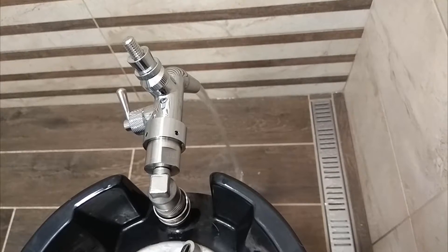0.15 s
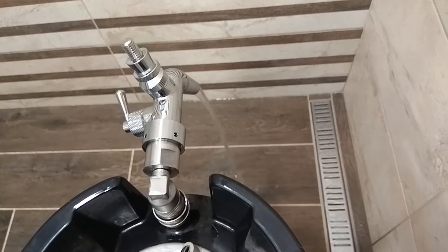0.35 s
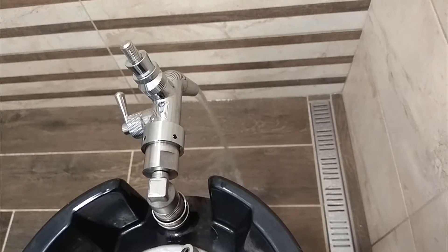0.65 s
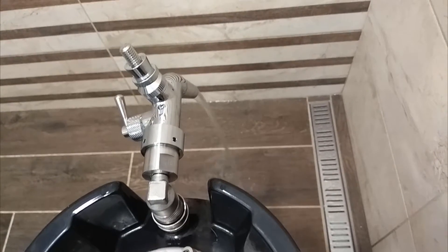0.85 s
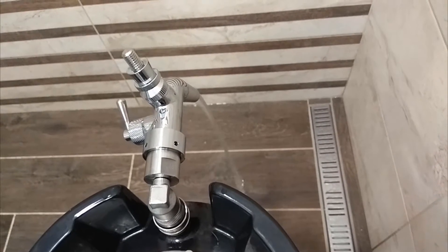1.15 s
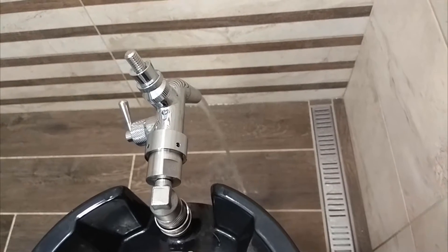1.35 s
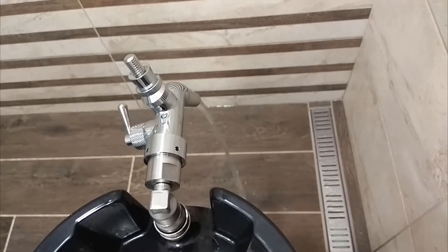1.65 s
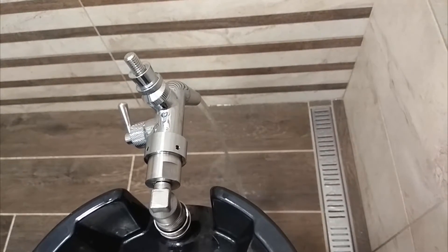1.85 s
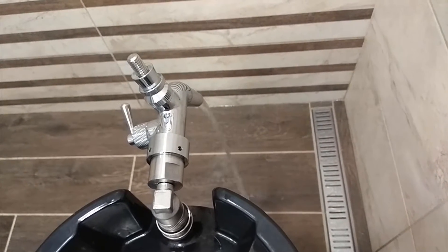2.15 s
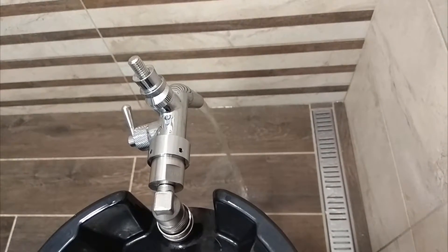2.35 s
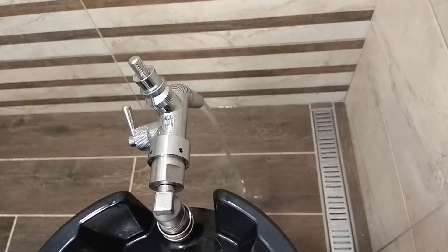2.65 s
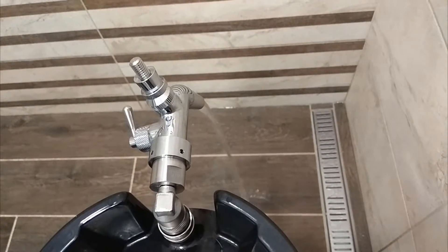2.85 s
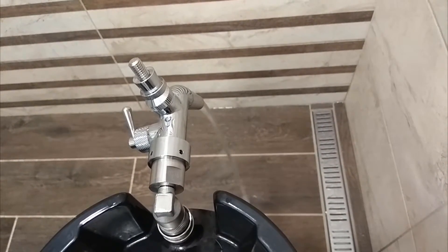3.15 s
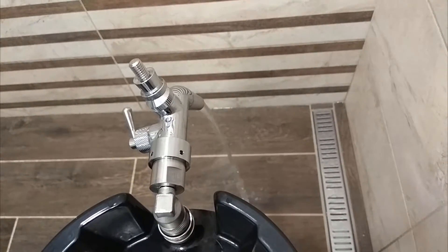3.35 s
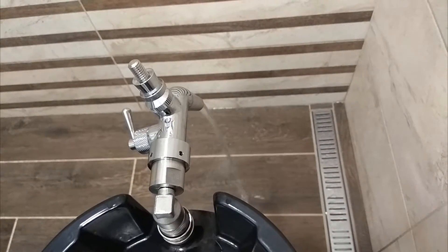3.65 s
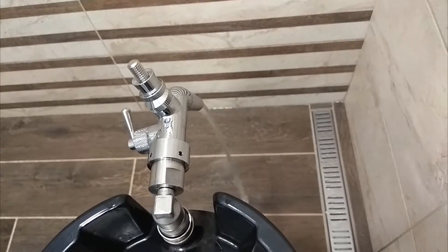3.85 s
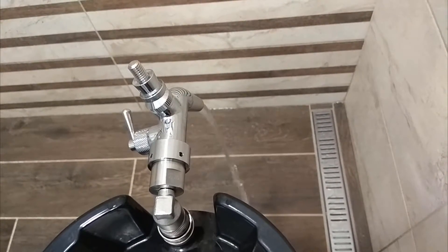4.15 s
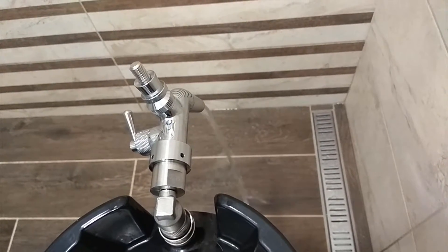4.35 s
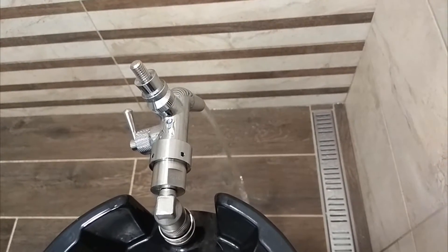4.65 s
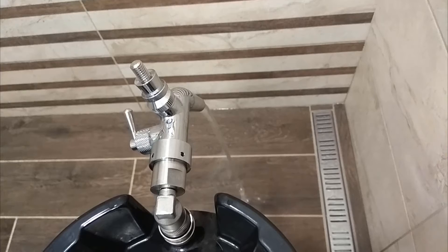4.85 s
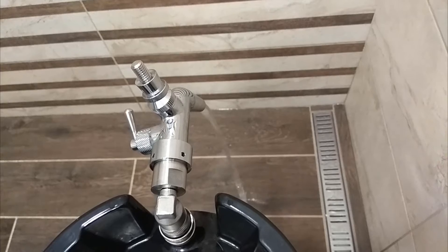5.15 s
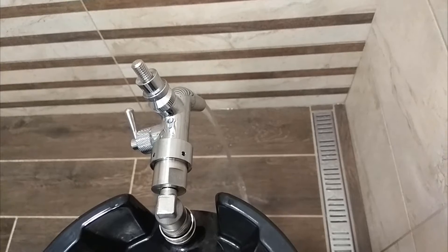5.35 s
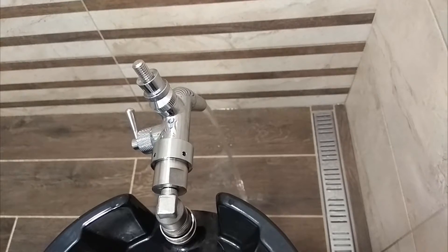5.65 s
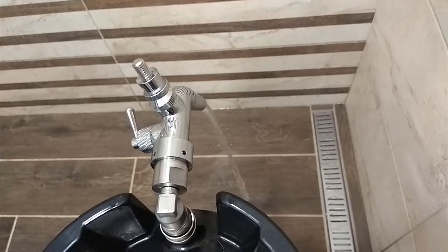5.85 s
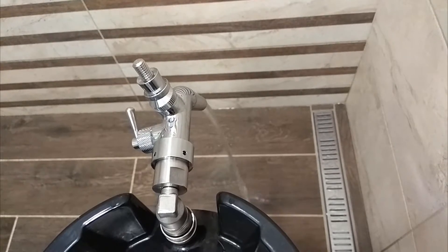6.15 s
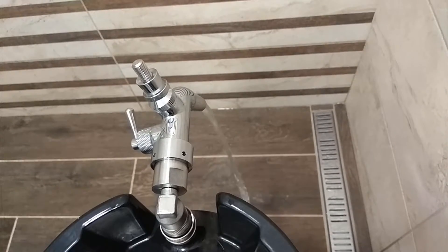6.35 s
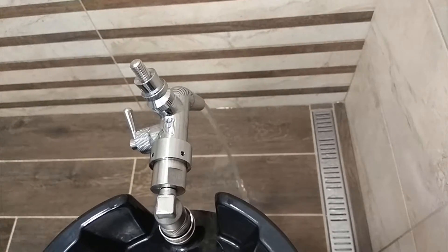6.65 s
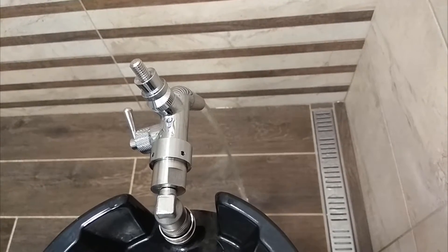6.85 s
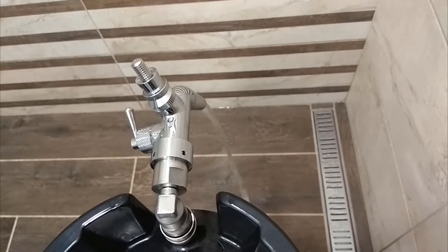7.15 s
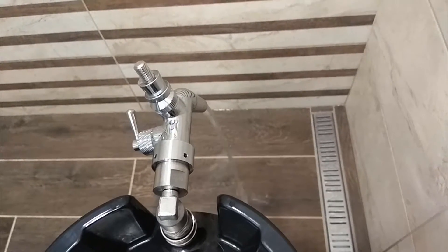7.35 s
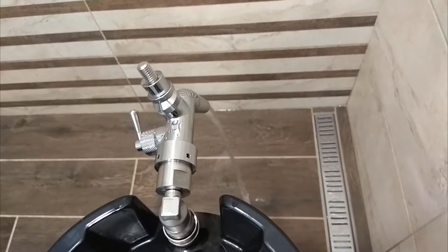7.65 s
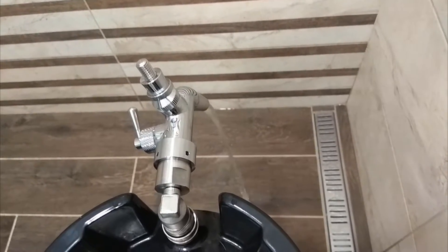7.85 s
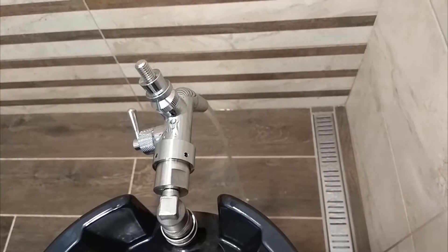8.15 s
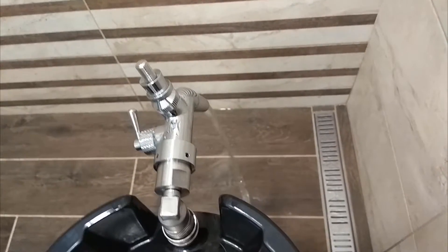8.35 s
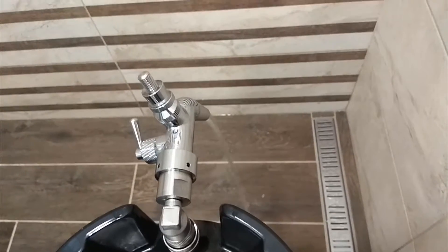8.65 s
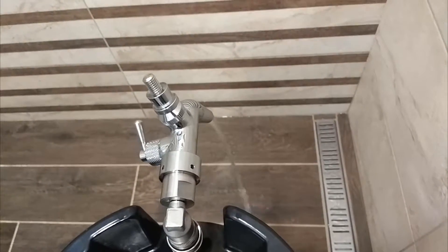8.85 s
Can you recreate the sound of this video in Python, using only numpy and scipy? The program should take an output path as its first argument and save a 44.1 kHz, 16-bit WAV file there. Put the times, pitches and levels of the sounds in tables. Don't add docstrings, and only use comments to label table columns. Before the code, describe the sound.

Water and gas spit from a metal spout in a small tiled bathroom, sharp irregular pops and crackles over fine spray hiss and fan hum.

```python
import sys
import numpy as np
from scipy import signal
from scipy.fft import rfft, irfft
from scipy.io import wavfile

SR = 44100
rng = np.random.default_rng(int(sys.argv[2]) if len(sys.argv) > 2 else 0)


def persist_wave(psi):
    counts = np.round(np.clip(psi, -1, 1) * 32767).astype(np.int16)
    wavfile.write(sys.argv[1], SR, np.atleast_2d(counts).T)


def undo_db(level):
    steps = np.asarray(level, float) / 20
    return 10 ** steps


N = 396900

# f/Hz, level/dB
FAN_COLOUR = [(30, -30), (60, -18), (120, -15), (140, -10.5), (155, 1), (200, -1), (340, -2), (405, -13.5),
              (455, -11.5), (770, -9), (890, -12.5), (1300, -15.5), (3000, -17.5), (5000, -68)]
# f/Hz, width/Hz, lift/dB
ROOM_MODES = [(160.4, 44, 5), (217.7, 14, 7.5), (282.1, 6.8, 7.5), (354.5, 32, 5), (450, 18, 8.5),
              (575.4, 16.5, 8.5), (775, 13, 8.5)]
# f/Hz, likeness (1 = the same)
FAN_LIKENESS = [(25, .8), (60, 0.9), (110, 0.88), (160, 0.98), (270, 1), (450, 0.2), (750, 0.16), (1200, 0)]
# start t/s, end t/s, f/Hz, level/dB
WHISTLES = [
    (8.15, 8.55, 1880, -61),
    (3.28, 3.44, 1050, -57),
]
# f/Hz, level/dB
SPRAY_COLOUR = [(3000, -14.5), (5000, -5), (6600, 0), (9000, 3), (11200, 9.5), (13500, 7.5), (15000, 6),
                (15700, -2.5)]
# t/s, level/dB
FLOW = [(0.0, -27.5), (0.15, -45), (0.77, -41.5), (1.0, -40.5), (1.38, -39.5), (2.35, -42.5), (2.56, -39.5),
        (3.21, -35), (3.53, -47), (3.86, -35), (4.56, -48.5), (4.89, -37), (5.71, -43), (5.86, -38.5),
        (6.09, -45), (6.54, -41.5), (8.45, -42.5), (9.0, -40.5)]
# f/Hz, level/dB
CRACK_COLOUR = [(1500, -31), (3000, -28), (4500, -12), (6700, -5.5), (9000, -4.5), (11300, 1), (13500, -4),
                (15000, -3), (15700, -2.5)]
# t/s, crack level/dB, tilt to treble/dB, ring level/dB,
# radius/mm
GULPS = [(0.204, -6, -23.5, -21, 0.77), (0.2771, -7.5, -17, -16, 1.16), (0.8572, -6, -8, -13, 1.56),
         (0.9209, -4.5, -9, -36, 1.9), (0.9773, -2, -16, -17.5, 2.07), (0.9775, -30, -10, -24, 0.71),
         (1.049, -7, -6, -11, 1.61), (1.5912, -6, -25.5, -17, 1.27), (1.6543, -18, 4, -26, 0.99),
         (1.6957, -11.5, -15, -14, 1.52), (2.237, -4.5, -7, -17.5, 0.9), (2.9763, -13, -15, -17, 0.95),
         (3.0978, -9, -1, -25.5, 1.01), (3.724, -6.5, -14, -18, 1.15), (3.8849, -6.5, -4, -10.5, 1.75),
         (4.192, -10.5, -4, -19.5, 1.33), (4.6356, -6.5, -5, -21, 0.94), (5.2629, -9, -16, -18, 0.8),
         (5.8068, -18.5, 1, -31, 0.98), (6.6803, -5.5, -15, -15.5, 1.48), (6.7805, -11.5, -10, -18, 0.8),
         (7.1917, -3.5, -23, -14.5, 0.95), (7.8492, -8, -29, -23.5, 0.88), (8.473, -13.5, -4, -26, 1.05),
         (8.8766, -2.5, 2.5, -34, 3.8), (2.15, -12.5, -11, -34.5, 1), (2.372, -7, -8, -21, 0.71),
         (2.595, -15.5, -9, -20.5, 0.57), (3.3902, -9, -18.5, -23, 0.41), (3.8396, -9.5, -1, -19, 0.7),
         (6.5183, -14, -23, -23, 0.63), (8.781, -13, 6, -21.5, 0.66)]
# t/s, crack level/dB, tilt to treble/dB, ring level/dB
SNAPS = [(0.239, -6.5, -7, -58), (2.7584, -9, -23.5, -36), (2.776, -12.5, 5, -56), (3.04, -24, -10, -37),
         (3.2081, -11, -5, -26), (3.71, -17, -5, -57), (4.174, -16, 9, -47), (4.2985, -6, -9, -47),
         (4.6815, -10, -5, -55), (4.7446, -13.5, -20, -38), (4.783, -11.5, -3, -54),
         (5.224, -12, -4, -19.5), (5.698, -0.1, 2.5, -39), (5.9956, -9.5, -8.5, -65),
         (6.2382, -7, -6.5, -43), (6.4052, -11.5, -14, -37), (6.44, -14, 10, -33.5),
         (6.607, -10.5, -2, -33), (6.673, -11.5, -13, -37), (6.9854, -7, -15, -47), (7.2485, -8, -14, -43),
         (7.697, -11, -14, -45), (8.2303, -10, -9.5, -55), (8.5246, -15, 10, -42), (8.756, -10, -7, -41),
         (8.8758, -18, 2, -22)]
# t/s, crack level/dB, tilt to treble/dB
SPITS = [(0.085, -19, -1), (0.379, -20, -4), (0.4453, -20.5, -12), (0.544, -15.5, -8), (0.685, -13, -9),
         (1.172, -15.5, -9), (1.366, -21.5, 0), (1.7685, -19, -14), (1.877, -21.5, -20),
         (1.9857, -18.5, -3), (2.099, -20, 10), (2.548, -19.5, 7), (2.825, -16, -10), (2.9143, -22, 0),
         (3.3447, -12, -11), (3.549, -16.5, -16), (4.12, -31.5, 27), (4.514, -19, -4), (4.9068, -14, -6),
         (5.037, -13.5, -7), (5.195, -16.5, -1), (5.4836, -23, -11), (5.9066, -23, 1), (5.971, -16.5, -4),
         (6.194, -17, -21), (6.316, -19, 6), (6.886, -17.5, -14), (7.407, -13.5, -7.5), (7.977, -18, 5),
         (8.629, -17.5, -6)]
# t/s, crack level/dB
TICKS = [(0.028, -25), (0.18, -27), (0.523, -22), (2.324, -21), (2.865, -17.5), (3.3129, -21),
         (3.6164, -19.5), (3.66, -18), (4.287, -18), (4.4448, -21), (4.547, -24.5), (5.1572, -14.5),
         (5.441, -20), (5.6704, -21.5), (6.135, -22), (7.082, -24), (7.109, -19), (7.142, -21),
         (7.452, -42), (7.609, -25), (7.66, -22), (7.9344, -39), (8.131, -27), (8.183, -19.5),
         (8.204, -16.5), (8.4257, -20), (8.651, -20)]
# left delay t/ms, right delay t/ms, level/dB
ECHOES = [
    (0.88, 0.8, 3.5),
    (3.0, 2.3, -7),
    (4.6, 3.8, -4),
    (5.3, 4.7, -7),
    (6.0, 5.8, -6),
    (7.6, 6.5, -9),
]
# f/Hz, t/s
TILE_FADE = [(700, 0.19), (1500, 0.29), (3000, 0.29), (6000, 0.18), (10000, 0.28), (15000, 0.15)]
# f/Hz, left minus right level/dB
MIC_LEAN = [(300, 0.5), (700, -0.5), (2500, -2), (5000, -1.5), (9000, -1), (14000, 3.5)]

POCKET_PITCH = 3260
SMALL_MM = 0.6


def rms_one(x):
    return x / np.sqrt(np.mean(x ** 2) + 1e-20)


def at_hz(points, hz):
    table = np.array(points)
    return np.interp(np.log(np.maximum(hz, 1)), np.log(table[:, 0]), table[:, 1])


def coloured(x, spectrum):
    length = x.shape[-1]
    gain = undo_db(at_hz(spectrum, np.fft.rfftfreq(length, 1 / SR)))
    return irfft(rfft(x) * gain / np.sqrt(np.mean(gain ** 2)), length)


def band(x, low_hz, high_hz, order=2):
    limits = [low_hz, min(high_hz, .45 * SR)]
    return signal.sosfilt(signal.butter(order, limits, "band", fs=SR, output="sos"), x)


def drift(rate):
    step = 40
    r = np.exp(-2 * np.pi * rate * step / SR)
    noise = rng.standard_normal(N // step + 2002)
    slow = signal.lfilter([1], [1, -2 * r, r * r], noise)[2000:]
    return np.interp(np.arange(N) / step, np.arange(len(slow)), rms_one(slow))


def fan():
    hz = np.fft.rfftfreq(N, 1 / SR)
    mid, side = rfft(coloured(rng.standard_normal((2, N)), FAN_COLOUR))
    lift_db = 0
    for peak_hz, width_hz, db in ROOM_MODES:
        lift_db = lift_db + db / (1 + (2 * (hz - peak_hz) / width_hz) ** 2)
    alike = np.clip(at_hz(FAN_LIKENESS, hz), -1, 1)
    both = np.sqrt(1 + alike) * mid + np.sqrt(1 - alike) * side * [[1], [-1]]
    sway = undo_db(.4 * drift(3))
    return undo_db(-48.5) * sway * rms_one(irfft(both * undo_db(lift_db), N))


def bathroom(x, echoes, tail_db, lag_ms, count=4):
    t = np.arange(SR // 2) / SR
    edges = 350 * 2 ** np.arange(0, 6.1, .5)
    tail = 0
    for low, high in zip(edges, edges[1:]):
        spots = count if low > 3500 else 1
        noise = rms_one(band(rng.standard_normal((spots, 2, len(t))), low, high))
        noise = noise * np.sqrt((high - low) / SR * 2)
        tail = tail + noise * undo_db(-60 * t / at_hz(TILE_FADE, np.sqrt(low * high)))
    lumps = np.repeat(rng.exponential(1, (count, 2, len(t) // 10)) - 1, 10, axis=2)
    tail = tail * undo_db(3.5 * lumps * np.exp(-t / .03))
    build_up = np.clip((t - .001) / .0035, 0, 1)
    answer = undo_db(tail_db) * tail * build_up
    answer[:, 0, 0] = 1
    answer[:, 1, round(lag_ms * SR / 1000)] = 1
    for left_ms, right_ms, db in echoes:
        shift = 1 + .04 * rng.standard_normal((count, 1))
        lags = np.round(shift * [left_ms, right_ms] * SR / 1000).astype(int)
        answer[np.arange(count)[:, None], [0, 1], lags] += undo_db(db)
    answer /= np.sqrt(np.sum(answer ** 2, axis=2, keepdims=True))
    spot = np.repeat(rng.integers(0, count, N // 2048 + 1), 2048)[:N]
    out = np.zeros((2, N))
    for k in range(count):
        out += signal.oaconvolve((x * (spot == k))[None], answer[k], axes=1)[:, :N]
    return out


def whistles():
    out, t = np.zeros(N), np.arange(N) / SR
    for start, end, hz, db in WHISTLES:
        swell = np.sin(np.pi * np.clip((t - start) / (end - start), 0, 1))
        out += undo_db(db) * swell * rms_one(band(rng.standard_normal(N), hz - 110, hz + 110))
    return out


def droplets(per_s, spread_db, clump_db):
    sizes = undo_db(spread_db * np.minimum(rng.exponential(1, N), 5)) * rng.choice([-1, 1], N)
    hits = rng.random(N) < per_s / SR
    return rms_one(sizes * hits * undo_db(clump_db * drift(18)))


def stream():
    flow_db = np.interp(np.arange(N) / SR, *np.transpose(FLOW))
    slugs = np.full(N + SR, 1e-18)
    splash_db, delay_s, fade_s = -32, 0.019, 0.34
    for s, crack_db, *_ in pockets():
        slugs[round((s + delay_s) * SR)] += undo_db(crack_db + splash_db)
    splash = signal.lfilter([1], [1, -undo_db(-60 / fade_s / SR)], slugs[:N])
    fine = droplets(2000, spread_db=4.6, clump_db=2.0)
    coarse = droplets(900, spread_db=4.0, clump_db=2.0)
    spray = coloured(fine, SPRAY_COLOUR) * (undo_db(flow_db + 1.5) + splash)
    patter_db = -57 + 0.21 * (flow_db - flow_db.mean())
    patter = rms_one(band(coarse, 2050, 7800)) * (undo_db(patter_db) + undo_db(-36) * splash)
    return spray + patter


def pockets():
    rows = GULPS + [(*row, SMALL_MM) for row in SNAPS]
    rows += [(*row, -np.inf, SMALL_MM) for row in SPITS]
    rows += [(*row, -9.5, -np.inf, SMALL_MM) for row in TICKS]
    for s, crack_db, tilt_db, ring_db, radius_mm in sorted(rows):
        ring_db = max(ring_db, crack_db - 29)
        yield s, crack_db, tilt_db, ring_db, POCKET_PITCH / np.clip(radius_mm, .3, 4)


def pops():
    tear_ms, hiss, crack_lift_db = .45, .4, 20.5
    ring_lift_db, ring_q = 23.5, 2.75
    dull, bright, body, push = np.zeros((4, N + 512))
    t = np.arange(512) / SR
    for s, peak_db, tilt_db, ring_db, own_hz in pockets():
        i = round(s * SR)
        tear = hiss * rng.standard_normal(512) * np.exp(-1000 * t / tear_ms)
        tear[0] = 1
        tear /= np.sqrt(np.sum(tear ** 2))
        crack_db = peak_db + crack_lift_db
        dull[i:i + 512] += undo_db(crack_db - (tilt_db + 15.5) / 2) * tear
        bright[i:i + 512] += undo_db(crack_db + (tilt_db + 5.5) / 2) * tear
        w = 2 * np.pi * own_hz / SR
        r = np.exp(-w / (2 * ring_q))
        ring = signal.lfilter([1, -2, 1], [1, -2 * r * np.cos(w), r * r], t == 0)
        edge = signal.butter(4, 0.71 * own_hz, "high", fs=SR, output="sos")
        body[i:i + 512] += undo_db(ring_db + ring_lift_db) * signal.sosfilt(edge, ring)
        push[i] += undo_db(ring_db) * (POCKET_PITCH / own_hz) ** 2
    top = np.clip(np.log2(np.fft.rfftfreq(N, 1 / SR) / 7000 + 1e-9), 0, 1)
    crack = irfft(rfft(dull[:N]) * (1 - top) + rfft(bright[:N]) * top, N)
    ringing = band(body[:N], 300, 6500, order=1)
    thud = undo_db(3.5) * band(push[:N], 560, 1040, order=1)
    puff = undo_db(-38) * band(bright[:N], 730, 3900)
    return coloured(crack, CRACK_COLOUR) + ringing + thud + puff


def scene():
    floor = bathroom(stream(), ECHOES[:1], tail_db=-8.5, lag_ms=.25)
    spout = bathroom(pops() + whistles(), ECHOES, tail_db=-19, lag_ms=.1)
    return spout + floor + fan()


def low_pass(x):
    return signal.sosfilt(signal.butter(12, 15750, fs=SR, output="sos"), x)


def record(dry):
    hz = np.fft.rfftfreq(N, 1 / SR)
    lean_db = at_hz(MIC_LEAN, hz) / 2 * np.array([[1], [-1]])
    fall_db = -16 * np.clip((hz - 15750) / 150, 0, 1)
    ports = irfft(rfft(dry) * undo_db(lean_db + fall_db), N)
    rounded = 1.6 * np.tanh(ports / 1.6)
    return low_pass(rounded)


dry = scene()
out = record(dry)
persist_wave(out)
```